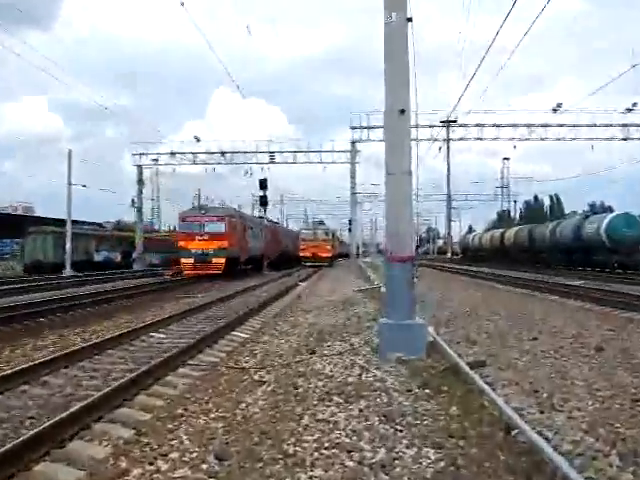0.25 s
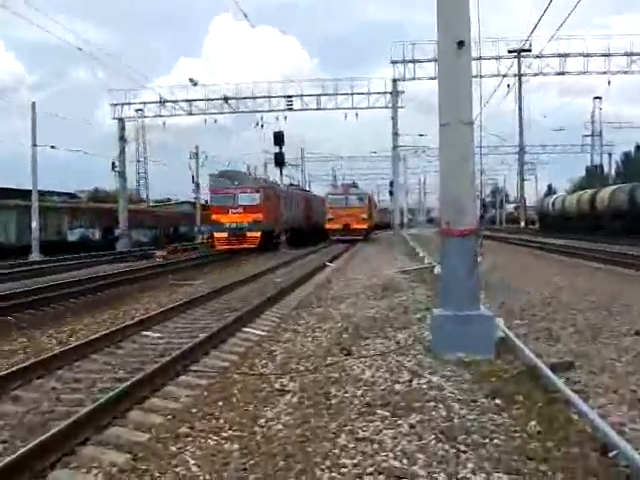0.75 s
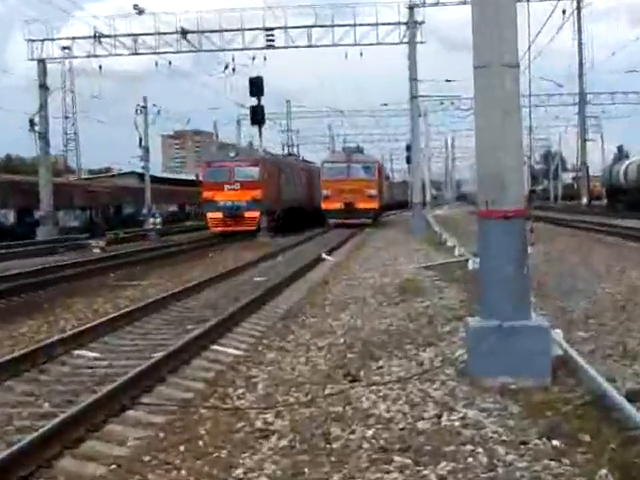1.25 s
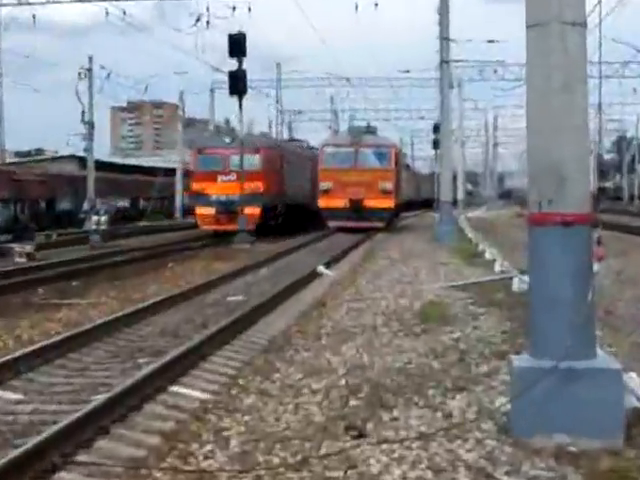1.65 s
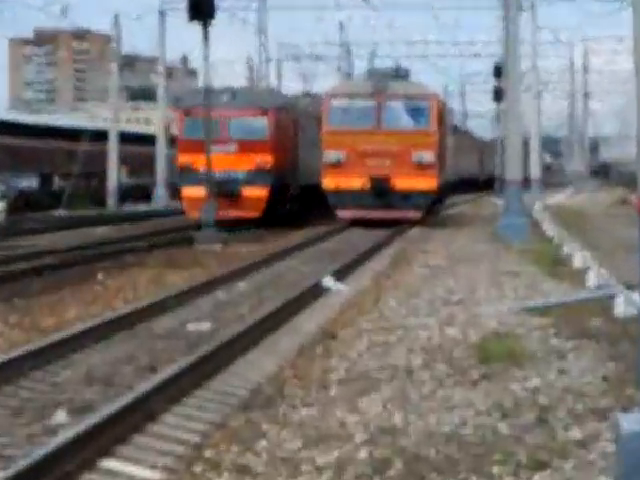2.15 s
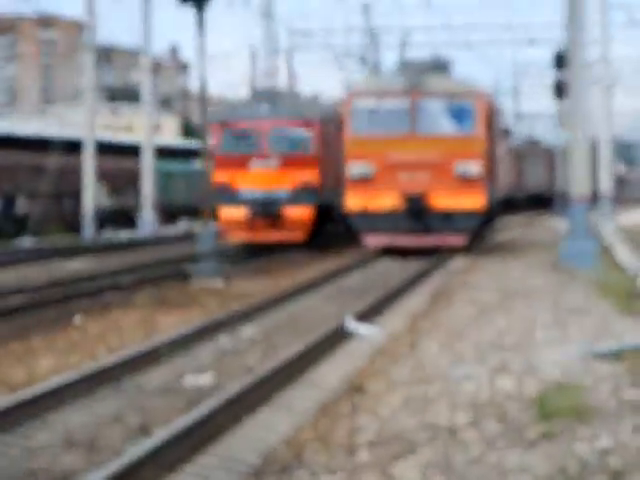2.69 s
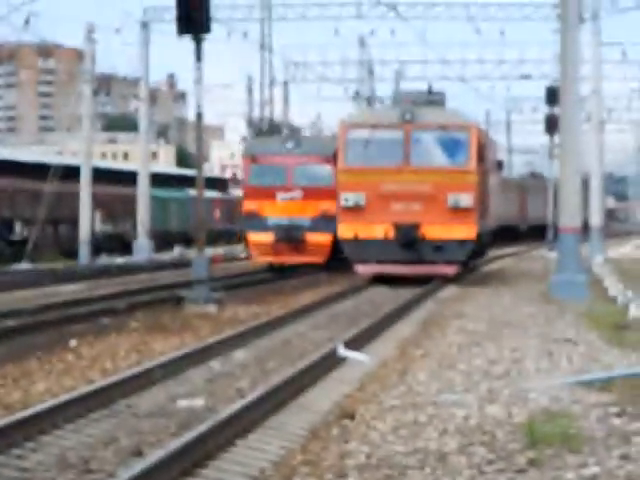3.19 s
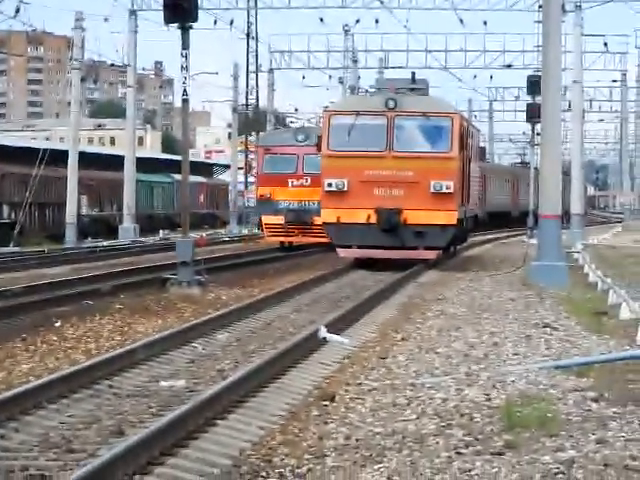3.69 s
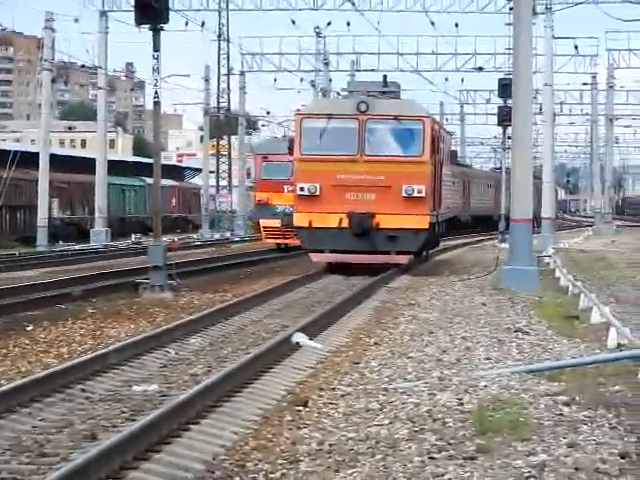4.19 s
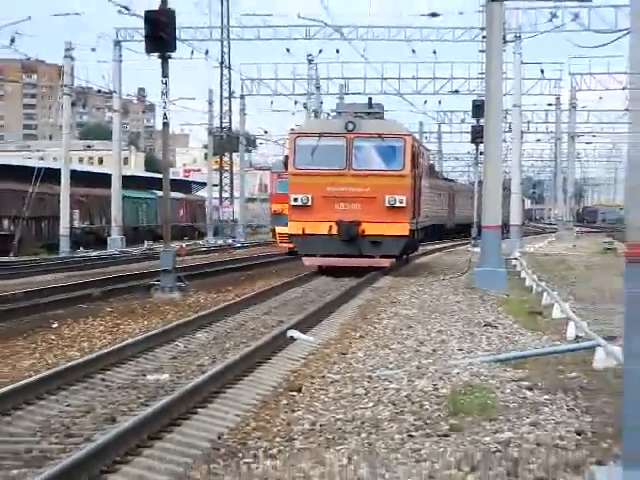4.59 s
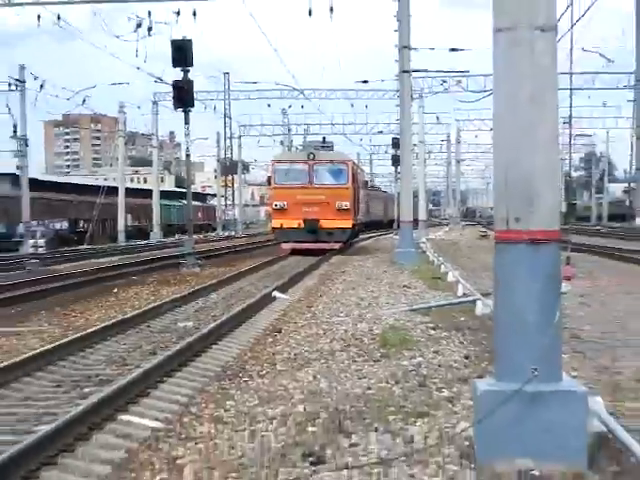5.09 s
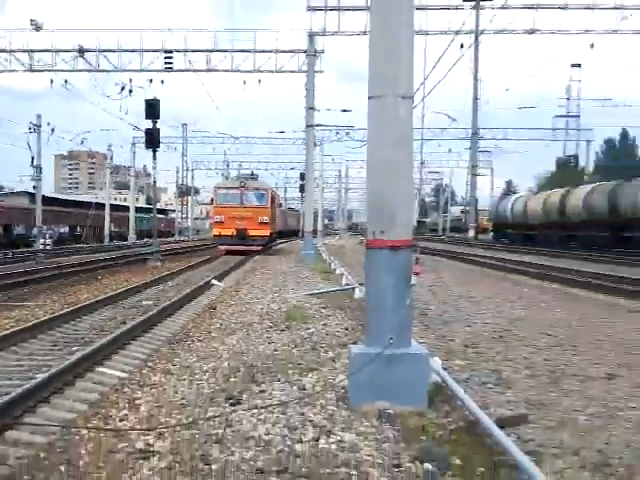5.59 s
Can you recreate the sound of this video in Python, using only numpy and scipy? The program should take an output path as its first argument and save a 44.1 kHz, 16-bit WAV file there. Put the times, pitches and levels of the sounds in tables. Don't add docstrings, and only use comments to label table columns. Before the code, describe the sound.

Electric train wheels rush and rumble past in a rail yard, three tiny camera clicks dip the sound, motors swell, wind buffets, then everything recedes.

```python
import sys
import numpy as np
from scipy import signal
from scipy.fft import rfft, irfft
from scipy.io import wavfile
from scipy.ndimage import uniform_filter1d

SR = 44100
rng = np.random.default_rng(int(sys.argv[2]) if len(sys.argv) > 2 else 0)


def boost(x):
    u = np.asarray(x, float) / 20
    return 10 ** u


def wrap_up_sound(samples):
    columns = np.atleast_2d(samples).T
    tamed = np.clip(columns, -1, 1)
    steps = np.round(tamed * 32767).astype(np.int16)
    wavfile.write(sys.argv[1], SR, steps)


N = 257972


def evened(x):
    return x / np.sqrt(np.mean(x ** 2) + 1e-20)


def read(points, hz):
    f, value = np.transpose(points)
    return np.interp(np.log(hz + 1), np.log(f + 1), value)


def curve(rows):
    s, value = np.transpose(rows)
    return np.interp(np.arange(N) / SR, s, value)


def bump(s, half_s):
    return np.exp(-((np.arange(N) / SR - s) / half_s) ** 2)


def lowpass(x, hz):
    return signal.lfilter(*signal.butter(N=2, Wn=hz, fs=SR), x)


def flutter(rate_hz):
    return evened(lowpass(rng.standard_normal(N), rate_hz))


def add(mix, s, sound):
    part = mix[:, round(s * SR):][:, :sound.shape[1]]
    part += sound[:, :part.shape[1]]


def train(patchy_db=0.46, throb_db=0.55):
    # f/Hz, density/dB
    rolling_db = [(22, -24), (45, 7.5), (120, 1), (200, -4), (410, -10), (620, -7), (950, -13.5),
                  (1320, -18), (2190, -18), (3300, -25.5), (5460, -22.5), (6900, -36), (7900, -36),
                  (8600, -53.5)]
    # f/Hz, width/Hz, level/dB
    resonances = [(53.6, 22, 4), (223.4, 28, 8), (597, 96, 1.5), (954, 240, 4), (1324, 130, -2),
                  (1690, 300, 1.5), (2377, 120, -2.5), (2727, 1100, 4), (5390, 820, 5), (6574, 590, 8.5)]
    splits_hz = (290, 1250, 3200)
    # f/Hz, correlation/1
    likeness = [(60, 0.99), (240, 0.95), (600, 0.98), (1200, .93), (2200, 0.86), (4000, 0.74), (7400, 0.63)]
    # f/Hz, phase/rad
    lead_rad = [(0, 0.026), (1640, 0.065), (2070, 0.11), (3010, 0.38), (3270, 0.75), (3530, 0.057),
                (4050, 0.7), (4910, 0.44), (5430, 0.25), (5940, 0.8), (7580, 0.91)]
    # f/Hz, level/dB
    tilt_db = [(60, -5.5), (100, -3), (170, -3.5), (300, -3.5), (510, -3.5), (870, -3.5), (1480, -1.5),
               (2530, -2.0), (4320, 0), (7380, -1.5)]

    frames, hz = N // 512 + 5, np.fft.rfftfreq(2048, 1 / SR)
    a, b, c, d, patches = rng.standard_normal((frames, 1025, 5)).T
    patches = uniform_filter1d(patches, size=24, axis=0)
    patches = evened(uniform_filter1d(patches, size=7, axis=1))

    same = np.clip(read(likeness, hz), -1, 1)[:, None]
    left = a + 1j * b
    right = same * left + np.sqrt(1 - same ** 2) * (c + 1j * d)
    right = right * np.exp(-1j * read(lead_rad, hz))[:, None]
    tilt = boost(read(tilt_db, hz) / 2)[:, None]

    colour_db = read(rolling_db, hz)
    for f, width_hz, db in resonances:
        colour_db = colour_db + db / (1 + (2 * (hz - f) / width_hz) ** 2)
    z = np.array([left * tilt, right / tilt]) * boost(colour_db[:, None] + patchy_db * patches)

    below = [1 / (1 + (hz / f) ** 10) for f in splits_hz]
    shares = np.diff([0 * hz, *below, 1 + 0 * hz], axis=0)
    out = 0
    for share, gain in zip(shares, layer_gains()):
        layer = signal.istft(z * np.sqrt(abs(share))[:, None], nperseg=2048, noverlap=1536)[1][:, :N]
        out = out + gain * evened(layer)
    return out * boost(throb_db * flutter(33))


def layer_gains(bogie_s=0.11):
    # t/s, nearness/dB
    nearness = [(0, -5), (.2, -5), (.37, -3), (.53, 0.5), (.74, -2.5), (1.0, -4), (1.23, -6), (1.5, -5.5),
                (1.8, -6.5), (2.33, -8), (2.6, -8.5), (3.2, -11), (3.9, -14), (4.6, -15.5), (5.85, -17)]
    # t/s, effort/dB
    effort = [
        (0, -17.5),
        (2.2, -10),
        (2.55, -.4),
        (2.85, 1),
        (3.3, -2.2),
        (3.65, -4),
        (4.1, -2.4),
        (4.52, -5),
        (4.7, -19),
        (5.85, -26),
    ]
    # near train at its closest/dB, share of nearness followed/1, second train/dB
    layers = [
        (-31, 0.07, -47.5),
        (-26, 0.5, -36),
        (-30, 0.65, -31.5),
        (-29, 1, -56.5),
    ]
    # t/s, rumble lift/dB, roar lift/dB
    bogies = [(.35, 1, 2.5), (.62, 6, 1.1), (.86, 4, 2), (1.06, 0, 1), (1.35, 3.5, 1), (1.93, 4.5, -0.4),
              (2.22, 2, -1), (2.45, -1, 1.5), (3.1, 4.5, 0.1), (3.3, .7, -0.5), (3.5, 0, 0.5),
              (3.72, 2.5, 4), (3.92, -1, 3.5), (4.3, -3.5, 2.5), (4.58, 3.5, -0.8), (5.04, 2, 1),
              (5.35, 2.5, 0), (5.85, 3, .6)]

    near_db, effort_db = curve(nearness), curve(effort)
    gains = []
    for db, share, second_db in layers:
        gains.append(np.hypot(boost(db + share * near_db), boost(second_db + effort_db)))
    for s, rumble_db, roar_db in bogies:
        crossing = bump(s, bogie_s)
        gains[0] = gains[0] * boost(rumble_db * crossing)
        gains[1] = gains[1] * boost(roar_db * crossing)
    return gains


def button(knock_t60_s=0.007, snap_t60_s=0.003, port_phase_rad=0.9):
    # t/s, knock/dB, knock f/Hz, housing ring/dB, wide snap/dB
    clicks = [
        (2.4002, -11, 800, -23, -25),
        (2.4146, -6, 1150, -20, -11.5),
        (2.4415, -25, 1300, -12.5, -21),
    ]
    # f/Hz, level/dB, t60/s
    modes = [(3800, -6, .006), (4350, -5, .006), (5050, -4, .015), (5350, 0, .008), (5750, -5, .005)]

    out, t = np.zeros((2, N)), np.arange(900) / SR
    port = np.array([[0], [port_phase_rad]])
    for s, db, hz, ring_db, snap_db in clicks:
        knock = boost(db - 60 * t / knock_t60_s) * np.sin(2 * np.pi * hz * t + port + np.pi)
        knock = knock * (1 - np.exp(-t / .0002))
        ring = 0
        for f, mode_db, t60_s in modes:
            phase = rng.uniform(0, 2 * np.pi) + port
            ring = ring + boost(mode_db - 60 * t / t60_s) * np.sin(2 * np.pi * f * t + phase)
        ring = boost(ring_db) * ring * (1 - np.exp(-t / .0009))
        burst = lowpass(rng.standard_normal((2, len(t))), 8000)
        snap = boost(snap_db - 60 * t / snap_t60_s) * (burst + .2 * burst[::-1])
        add(out, s, knock + ring + snap)
    return out


def wind(lumpy_db=4, right_db=2, shared=0.27, calm_db=-49):
    # f/Hz, density/dB
    wind_db = [(12, -41), (20, -6), (59, 14.5), (134, 10), (262, -10), (358, -20), (416, -24), (700, -25.5),
               (910, -49.5), (1540, -120)]
    # middle t/s, half length/s, level/dB
    gusts = [(.5, .12, -33), (0.927, 0.083, -33.5), (1.227, 0.06, -25), (1.434, 0.028, -21),
             (1.77, 0.071, -38), (2.115, 0.064, -36), (2.35, 0.089, -30), (2.62, 0.21, -25),
             (3.19, 0.084, -34), (3.556, 0.14, -29), (3.943, 0.22, -31), (4.302, .1, -28),
             (4.796, 0.12, -30.5), (5.163, 0.087, -35)]
    # t/s, peak level/dB, f/Hz (eddy size), left minus right/dB
    puffs = [(0.455, -18, 69.6, -3), (0.92, -18, 115, -10), (0.987, -17, 144, -8), (1.024, -15, 185, -4.5),
             (1.21, -12.5, 115, 12), (1.317, -13.5, 107.0, -25), (1.438, -11, 78, -15),
             (1.636, -20, 102, -7), (2.009, -18, 118, -4), (2.153, -23, 98, -1), (2.569, -13, 153.0, 17),
             (2.638, -14.5, 115, -10), (2.667, -13.5, 130.0, 10), (2.809, -16, 125, -14),
             (3.119, -12, 125, 8), (3.159, -17, 103.0, -7), (3.206, -17, 226, 6), (3.414, -19, 184.0, 7),
             (3.466, -15, 210, 17), (3.505, -20, 80.6, -4.0), (3.54, -18, 143.0, -19), (3.587, -8, 230, 11),
             (3.617, -12.5, 150, 15), (3.667, -11, 156, 12), (3.692, -13.5, 155, 4),
             (3.726, -12.5, 161, 21), (3.863, -10.5, 173, -9.5), (4.324, -16, 98.5, -17),
             (4.345, -17, 83.6, -12), (4.676, -12, 174, 7)]

    colour = boost(read(wind_db, np.fft.rfftfreq(N, 1 / SR)))
    ports = []
    for _ in "LR":
        turbulence = irfft(rfft(rng.standard_normal(N)) * colour, N)
        ports.append(turbulence * boost(lumpy_db * flutter(9.9)))
    out = np.array(ports)
    gusting = boost(calm_db) + sum(boost(db) * bump(s, half_s) for s, half_s, db in gusts)
    out = evened(out + shared * out[::-1]) * gusting * boost(np.array([[-right_db], [right_db]]))

    t = np.arange(-1300, 1300) / SR
    for s, db, hz, pan_db in puffs:
        phase = rng.uniform(0, 2 * np.pi, 3)
        glide = 1 + .13 * np.sin(phase[2]) * t * hz
        puff = np.exp(-(t * hz / 0.72) ** 2) * np.cos(2 * np.pi * hz * t * glide + phase[0])
        edge = np.exp(-(t * hz / .5) ** 2) * np.cos(2 * np.pi * 2.2 * hz * t + phase[1])
        port_db = db + np.minimum([[pan_db], [-pan_db]], 0)
        add(out, s + t[0], boost(port_db) * (puff + 0.19 * edge))
    return out


def self_noise(level_db=-58):
    white = rng.standard_normal((2, N)) + rng.standard_normal(N)
    return boost(level_db) * lowpass(white, 7500)


def gain_control(duck_s=2.4168, depth_db=-13.5, attack_s=0.0013, recover_s=0.68):
    since = np.arange(N) / SR - duck_s
    attack = np.clip(since / attack_s + 1, 0, 1)
    recovery = np.clip(1 - since / recover_s, 0, 1)
    return boost(depth_db * attack * recovery)


def scene():
    return (train() + wind() + self_noise()) * gain_control() + button()


def response(x, low_cut_hz=33.5, high_cut_hz=11500):
    # f/Hz, width/Hz, depth/dB
    notches = [(2499, 100, -14), (3198, 150, -24), (4997, 100, -12)]
    hz = np.fft.rfftfreq(N, 1 / SR)
    gain = hz ** 2 / np.sqrt(hz ** 4 + low_cut_hz ** 4) / np.sqrt(1 + (hz / high_cut_hz) ** 16)
    for f, width_hz, depth_db in notches:
        off = (2 * (hz - f) / width_hz) ** 2
        gain = gain * np.sqrt((off + boost(depth_db) ** 2) / (off + 1))
    return irfft(rfft(x) * gain, N)


def thinned(x, from_hz=6800, under_db=-17.5, slope_db_per_khz=-2.6, uneven_db=2.8):
    hz, _, z = signal.stft(x, SR, nperseg=2048, noverlap=1536)
    power = uniform_filter1d((abs(z) ** 2).sum(0), size=2, axis=0)
    power = uniform_filter1d(power, size=5, axis=1)
    masker = power[(hz > 2000) & (hz < 6000)].mean(0)
    budget = rng.standard_normal((len(masker) // 6 + 1, len(hz) // 8 + 1))
    budget = budget.repeat(repeats=6, axis=0).repeat(repeats=8, axis=1).T[:len(hz), :len(masker)]
    limit_db = under_db + slope_db_per_khz * (hz[:, None] - from_hz) / 1000 + uneven_db * budget
    keep = (power > masker * boost(limit_db) ** 2) | (hz < from_hz)[:, None]
    return signal.istft(z * keep, SR, nperseg=2048, noverlap=1536)[1][:, :N]


def band_limit(x):
    return signal.sosfilt(signal.butter(12, 12400, fs=SR, output="sos"), x)


def record(dry):
    mix = thinned(response(dry))
    return band_limit(mix)


dry = scene()
out = record(dry)
wrap_up_sound(out)
```